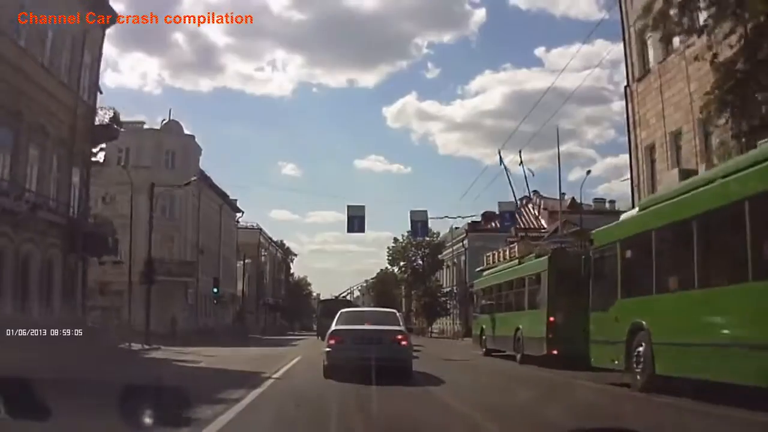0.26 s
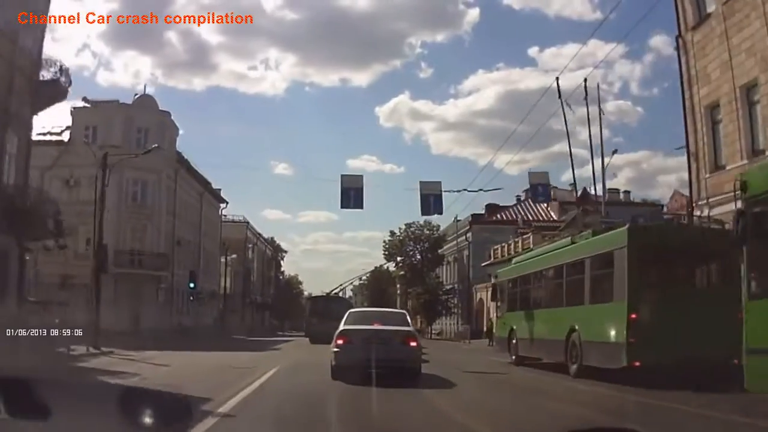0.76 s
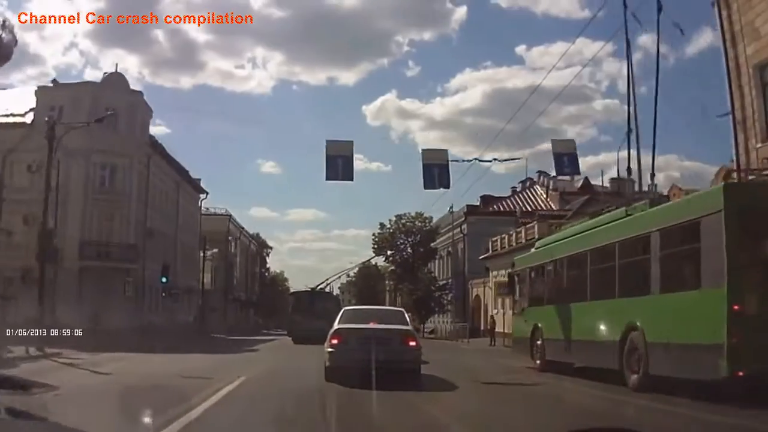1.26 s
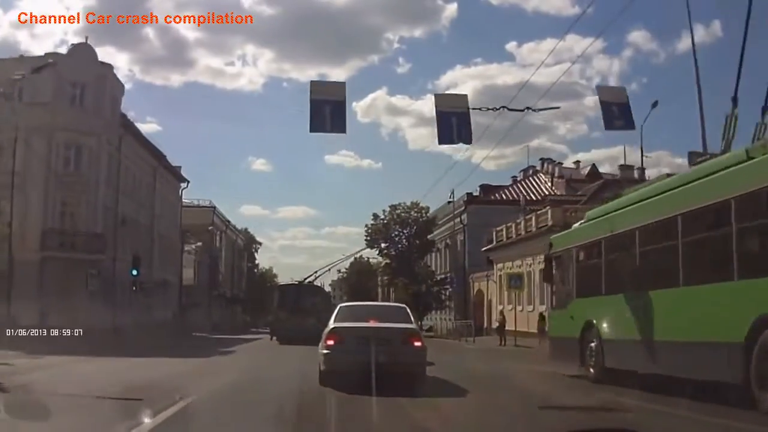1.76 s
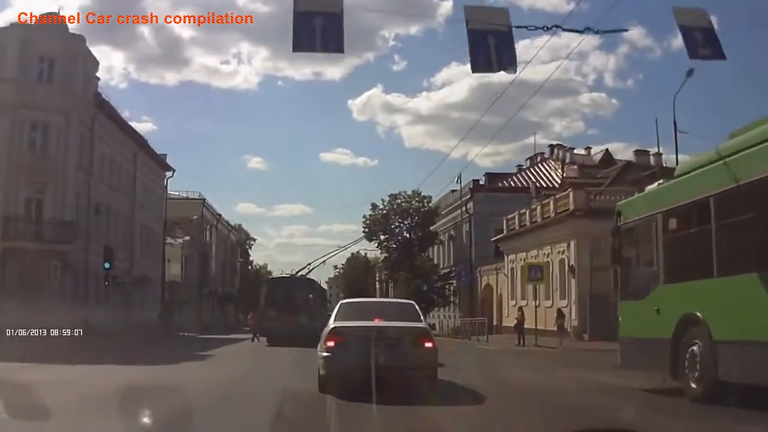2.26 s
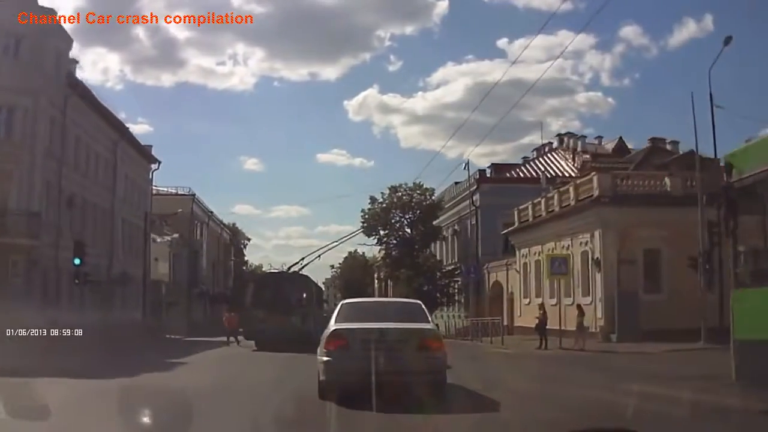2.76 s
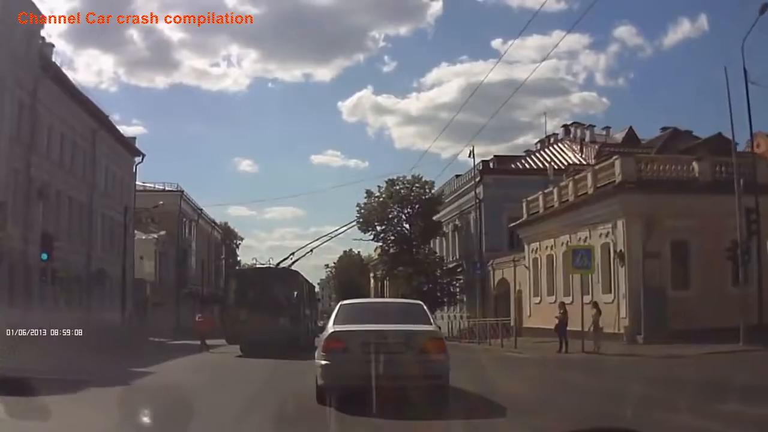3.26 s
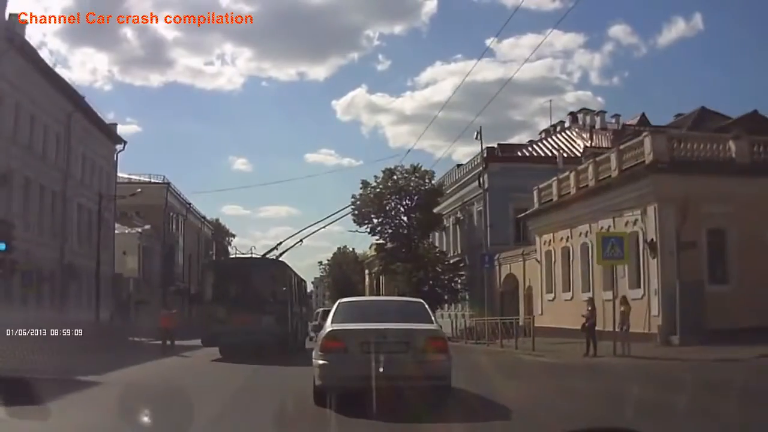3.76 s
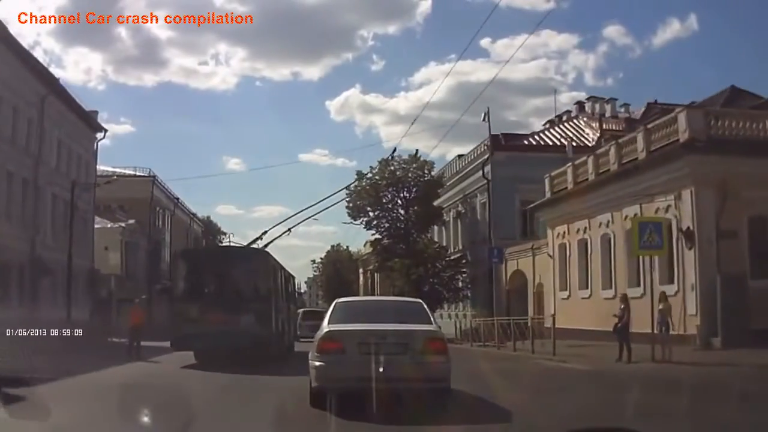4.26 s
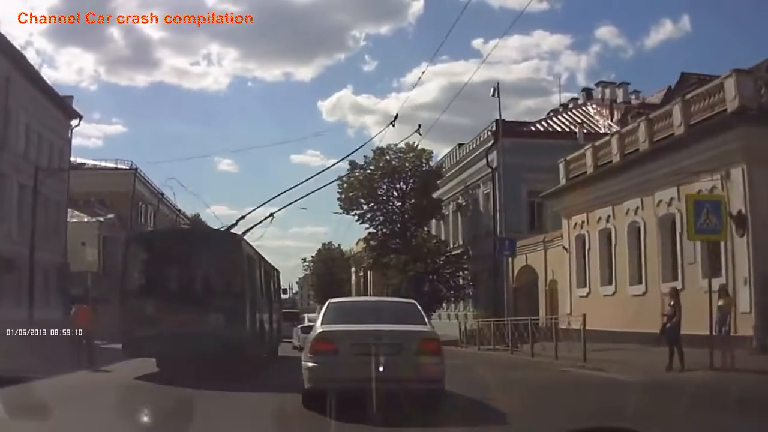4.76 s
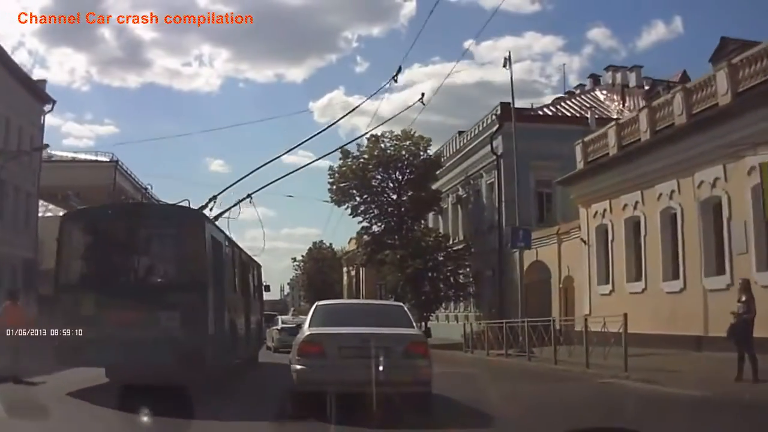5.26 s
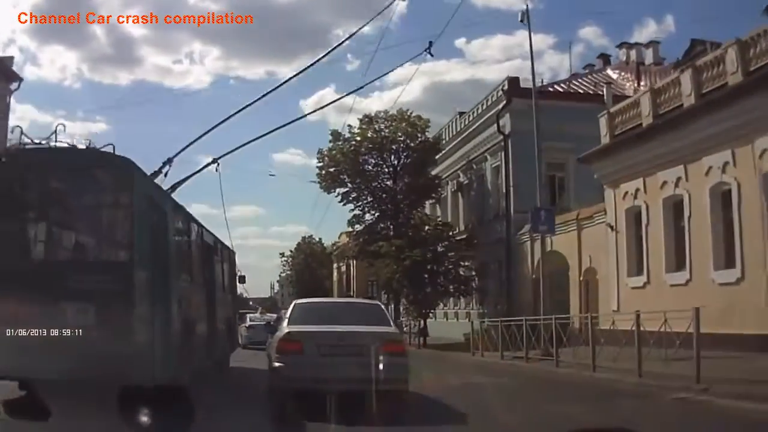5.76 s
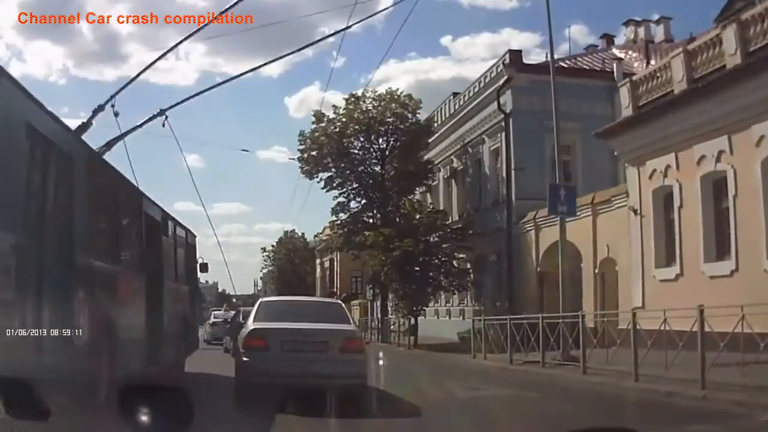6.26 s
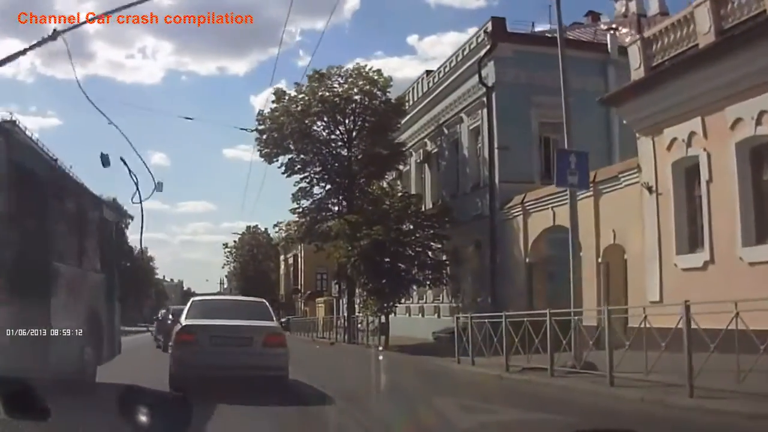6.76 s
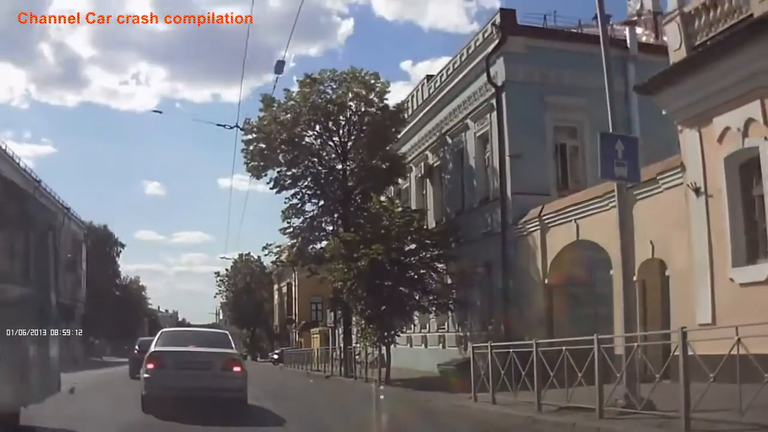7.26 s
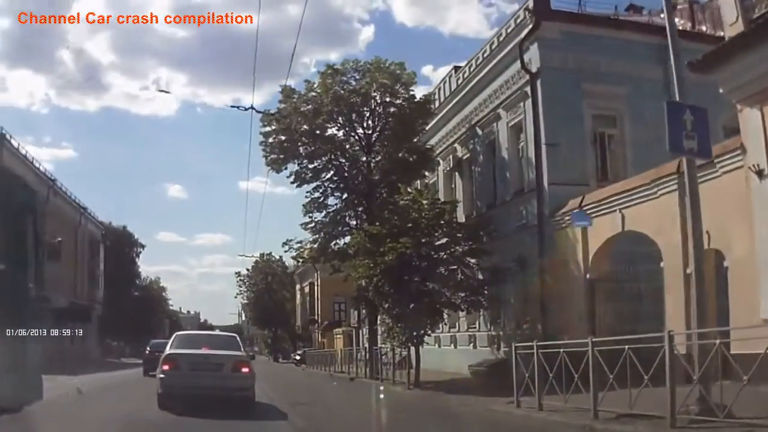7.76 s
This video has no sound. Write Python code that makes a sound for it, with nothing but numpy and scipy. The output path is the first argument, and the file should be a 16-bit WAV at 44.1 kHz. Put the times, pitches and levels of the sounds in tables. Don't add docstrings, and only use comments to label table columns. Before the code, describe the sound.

Crash debris cuts off at once, then a slow car's booming low cabin rumble, faint dash ticks, and dull bangs with rattling trim.

```python
import sys
import numpy as np
from scipy import signal
from scipy.fft import rfft, irfft, next_fast_len
from scipy.io import wavfile
from scipy.ndimage import uniform_filter1d, map_coordinates

SR = 44100
rng = np.random.default_rng(int(sys.argv[2]) if len(sys.argv) > 2 else 0)


def invert_db(x):
    u = np.asarray(x, float) / 20
    return 10 ** u


def to_wav(sig):
    pcm = np.clip(np.atleast_2d(sig), -1, 1) * 32767
    pcm = np.round(pcm).astype(np.int16)
    wavfile.write(sys.argv[1], SR, pcm.T)


N = 353241

# pitch_hz, level_db (per Hz)
HISS_COLOUR = [(1100, -28.5), (2000, 10.5), (3700, 4.5), (4700, 8), (5700, -16), (6900, 9.5), (7200, -14),
               (7400, -39), (8500, -26), (9600, -22), (10400, 5.5), (12200, -16.5), (12900, -31.5),
               (14400, -8.5)]
# pitch_hz, level_db (rms)
CIRCUIT_WHINE = [(7128, -80), (7183, -83), (10432, -83)]
# pitch_hz, threshold_db
TREBLE_THRESHOLD = [(3500, -14), (5700, -5), (7400, -2), (8500, -1), (9500, 3), (11500, 6), (12300, 6),
                    (13200, 2), (14500, 2)]
# start_s, peak_db
GAIN_EDGES = [(.2502, -39), (.4102, -32), (.5382, -40), (.6662, -33), (.6982, -40), (.7302, -37),
              (.7622, -36), (.7942, -35), (.8902, -35), (.9542, -36), (1.0182, -40), (1.1462, -36),
              (1.7862, -31), (2.2662, -36), (2.5862, -40), (2.7782, -34), (4.7302, -34), (4.7622, -37),
              (4.9542, -34), (4.9862, -36), (5.0502, -35), (5.4022, -39), (5.5622, -38), (5.6582, -37),
              (5.9782, -36), (6.1062, -34), (7.2902, -32), (7.3222, -37), (7.3862, -30), (7.4182, -41)]
# start_s, peak_db
OVERLOAD_CORNERS = [(.4268, -40), (.5044, -20), (.6776, -39), (.7517, -39), (.8075, -39), (.9627, -36),
                    (1.3817, -36), (1.4139, -38), (1.5911, -34), (1.6254, -38), (1.6361, -40),
                    (1.8231, -40), (1.8449, -38), (1.9924, -40), (2.065, -39), (2.0927, -39), (2.1127, -39),
                    (2.2806, -40), (2.565, -39), (4.7177, -40), (4.7852, -37), (4.9671, -40), (5.0602, -39),
                    (5.1828, -37), (5.4207, -39), (5.6915, -39), (5.7577, -39), (5.8327, -39),
                    (6.1154, -39), (7.4049, -37)]
# start_s, end_s, rate_per_s
CRACKLE_SPELLS = [(.12, 1.15, 8), (1.26, 1.5, 14), (1.55, 1.68, 30), (1.78, 2.2, 16), (2.26, 3.06, 26),
                  (4.68, 4.84, 20), (5.13, 5.48, 45), (5.5, 6.11, 16), (6.45, 6.53, 40), (7.27, 7.42, 20)]
# start_s, peak_db
LONE_STEPS = [(3.0532, -43), (3.5734, -43), (3.7702, -42), (7.1073, -42), (5.1782, -40), (2.0102, -41),
              (5.5302, -41)]
# start_s, suspension_load_db, quiet_sound_gain_db
DRIVE = [(0.1, -14.5, -37.5), (0.3, -14.5, -34.5), (0.91, -17.5, -40), (2.44, -15, -37), (2.56, -14.5, -38),
         (2.72, -15.5, -38.5), (3.01, -16, -36), (4.35, -17.5, -36), (5.23, -14.5, -40), (5.65, -17, -37.5),
         (6.8, -15, -35), (6.97, -15, -34.5), (7.17, -15.5, -36.5), (7.19, -17.5, -37), (7.68, -22, -36),
         (7.88, -23.5, -37.5), (7.92, -25, -35.5), (8.01, -25, -38.5)]
# pitch_hz, level_db (per Hz)
PAN_COLOUR = [(6, -21), (14, 2), (24, 2.5), (52, 9.5), (70, 7), (100, 10), (125, -12.5), (200, -77)]
# pitch_hz, level_db (per Hz)
DRUM_COLOUR = [(90, -15.5), (120, 0), (145, 3), (170, -3), (200, -11.5), (260, -78.5)]
# pitch_hz, level_db (per Hz)
BLOCK_COLOUR = [(150, -32), (200, -0.5), (243, 4.5), (275, -3), (320, 1), (380, -9), (480, -45.5)]
# pitch_hz, level_db (per Hz)
ROAR_COLOUR = [(260, 4.5), (400, 3), (480, 1), (650, -0.5), (1000, -2.5), (1350, -5.5), (1550, -16),
               (1800, -26), (2300, -54)]
# start_s, swell_db
POTHOLES = [
    (.51, 1.5),
    (2.47, 5),
    (3.21, 3),
    (5.17, 3),
    (6.38, 1),
    (6.78, 2),
    (7.12, 0),
]
# start_s, swell_db
ENGINE_SURGES = [
    (1.62, 3),
    (2.2, 2.5),
    (2.55, 1.5),
    (5.6, 2),
    (6.2, 3),
    (7.9, -2),
]
# start_s, pitch_hz, level_db
CABIN_BOOM = [(0.0, 48.3, -18), (0.62, 42.44, -13), (1.25, 42.43, -5.5), (1.54, 50.1, -18.5),
              (1.65, 42.5, -11), (2.68, 42.55, -15), (3.01, 52.72, -15.5), (3.23, 37.0, -16),
              (3.7, 37.32, -23), (3.81, 44.07, -19.5), (4.13, 45.4, -22), (4.37, 37.0, -17.5),
              (5.24, 39.57, -16), (5.4, 37.0, -11.5), (6.31, 48.5, -18), (6.8, 42.2, -16.5),
              (7.97, 42.5, -14.5), (8.01, 42.1, -33.5)]
# start_s, pitch_hz, level_db
BODY_SHAKE = [(0.0, 31.17, -25), (0.89, 32.91, -13.5), (1.31, 30.3, -17.5), (1.83, 33.03, -15),
              (2.16, 28.5, -22.5), (2.63, 33.04, -17), (2.77, 29.3, -20.5), (3.55, 30.98, -20),
              (3.86, 23.47, -27), (4.06, 31.2, -20.5), (4.91, 32.93, -13.5), (6.22, 32.9, -17),
              (6.42, 27.63, -11.5), (7.03, 27.5, -22.5), (7.45, 23.57, -18), (7.76, 23.73, -16.5),
              (7.92, 32.1, -17.5), (8.01, 32.66, -33.5)]
# start_s, level_db
DEBRIS_FADE = [(0, -18), (.02, -18), (.035, -22), (.055, -24.5), (.062, -35), (.075, -45.5), (.09, -59.5),
               (.11, -110)]
# pitch_hz, level_db (per Hz)
SHARD_COLOUR = [(150, -33), (250, -9.5), (484, -6.5), (555, -4), (614, -15.5), (668, -6), (1110, -14.5),
                (1210, -16.5), (3400, -19), (5380, -20.5), (6160, -19), (14400, -29)]
# pitch_hz, level_db, t60_s
SHEET_METAL = [(390, -23.5, .15), (562, -24, .15), (740, -27, .12), (6430, -30, .05)]
# pitch_hz, width_hz, level_db
TRIM_MODES = [(2300, 900, -5), (3250, 450, -4), (4750, 700, -5), (6050, 500, -9), (7100, 500, -10),
              (8600, 600, -12), (10500, 500, -16)]
# pitch_hz, width_hz, level_db
PANEL_MODES = [(330, 220, 0.5), (800, 360, 2), (1270, 370, 2.5)]
# start_s, peak_db
DASH_TICKS = [
    (2.852, -43),
    (3.228, -38),
    (3.569, -34.5),
    (3.964, -37.5),
]
# pitch_hz, width_hz, level_db, thud_db, t60_s
TICK_PARTS = [(2726, 420, -0.5, -7, 0.053), (5500, 900, -4, -9, .045)]
# start_s, rattle_peak_db, part_pitch_hz, part_width_hz, thud_over_rattle_db
BODY_BLOWS = [(4.267, -31.5, 4820, 3500, -6), (4.274, -31, 4570, 2400, 7.5), (4.311, -36.5, 4750, 5000, 6),
              (4.34, -48, 4198, 4000, 1), (6.59, -39, 3299, 7000, 13), (6.627, -35, 3606, 7000, 8),
              (6.649, -38.5, 2600, 4000, -2), (6.712, -41.5, 3290, 5000, 2), (6.772, -25.5, 3080, 1200, -1),
              (6.774, -33, 3600, 7000, 9.5), (6.799, -34, 4300, 3200, 12), (6.822, -35, 4230, 3000, -6),
              (7.363, -39, 4044, 4500, -9), (7.452, -47, 3600, 5000, 19), (7.634, -42, 4070, 5000, 12),
              (7.794, -44.5, 7000, 3500, -12), (7.871, -41, 4570, 5000, -1), (7.93, -47.5, 4470, 4000, -4)]
# start_s, peak_db, pitch_hz, thud_db
TRIM_SNAPS = [
    (4.281, -35, 2992, 4),
    (6.604, -35, 4000, 10),
    (6.63, -37, 5500, 1),
    (6.777, -29, 5500, 4),
    (7.445, -34.5, 3600, 19),
    (7.812, -31, 5500, -8),
]
# start_s, peak_db, pitch_hz, thud_db
TRIM_KNOCKS = [
    (6.864, -40, 3170, 5),
    (7.021, -50, 4670, 3),
    (7.056, -41.5, 3120, 10),
    (7.14, -47.5, 4700, 3),
    (7.744, -46, 4300, 3),
]
# start_s, peak_db, pitch_hz, width_hz
TRIM_SHIVER = [
    (6.9, -57, 4780, 450),
    (6.86, -50.5, 3400, 4600),
    (7.3, -55, 5000, 6000),
    (7.45, -56.5, 4300, 6000),
]

LOUDEST_SWING_DB = -7


def unit(x):
    return x / np.sqrt(np.mean(x ** 2) + 1e-20)


def curves(rows):
    s, *columns = np.transpose(rows)
    return [np.interp(np.arange(N) / SR, s, column) for column in columns]


def wobble(rate):
    knots = rng.standard_normal(int(N * rate / SR) + 4)
    return map_coordinates(knots, [np.arange(N) * rate / SR])


def swells(rows, width_s):
    t = np.arange(N) / SR
    return sum(db * np.exp(-((t - s) / width_s) ** 2) for s, db in rows)


def filtered(x, response):
    n = x.shape[-1]
    padded = next_fast_len(n + 8192)
    return irfft(rfft(x, padded) * response(np.fft.rfftfreq(padded, 1 / SR)), padded)[..., :n]


def noise(spectrum, shape=N):
    f, db = np.transpose(spectrum)
    white = rng.standard_normal(shape)
    return unit(filtered(white, lambda hz: invert_db(np.interp(np.log(hz + 1), np.log(f + 1), db))))


def resonances(modes):
    def response(f):
        return sum((-1) ** k * invert_db(db) * 1j * f * width / (hz * hz - f * f + 1j * f * width)
                   for k, (hz, width, db) in enumerate(modes))
    return response


def electronics():
    t = np.arange(N) / SR
    whine = sum(np.sqrt(2) * invert_db(db) * np.sin(2 * np.pi * hz * t) for hz, db in CIRCUIT_WHINE)
    slow_gain_db = uniform_filter1d(curves(DRIVE)[1], size=SR // 2)
    hiss_db = -61.5 + 0.83 * (slow_gain_db + 37) + 0.46 * wobble(36)
    return invert_db(hiss_db) * noise(HISS_COLOUR) + whine


def clicks():
    strong = GAIN_EDGES + OVERLOAD_CORNERS
    edges = np.arange(.0262, N / SR, .032)
    edges = edges[rng.random(len(edges)) < .4]
    faint = []
    for start, end, rate in CRACKLE_SPELLS:
        faint.append(rng.uniform(start, end, round(rate * (end - start))))
        faint.append(edges[(edges > start) & (edges < end)])
    neighbours = np.transpose(strong)[0] + .022 * rng.standard_normal(len(strong))
    faint = np.concatenate(faint + [neighbours])
    faint_db = -42 + rng.standard_normal(len(faint))
    return list(zip(faint, faint_db)) + strong + LONE_STEPS


def gain_steps(cabin):
    jumps = np.zeros(N)
    for s, db in clicks():
        i = round(s * SR)
        jumps[i] = -np.sign(cabin[i]) * invert_db(db + 12)
    leak = np.exp(-np.arange(SR // 20) / SR / 0.0016)
    edge = signal.fftconvolve(jumps, leak)[:N]
    smear = signal.fftconvolve(jumps ** 2, np.hanning(SR // 120), "same")
    grit_colour = [(1200, 1.5), (2000, -1.5), (7000, -12.0), (14500, -13.5)]
    grit = invert_db(-23.5) * np.sqrt(np.abs(smear)) * noise(grit_colour)
    return filtered(edge, lambda hz: 1 / (1 + 1j * hz / 11000) ** 2) + grit


def thinned(x, whim_db):
    hz, _, z = signal.stft(x, SR, nperseg=2048)
    whim = rng.standard_normal((len(hz) // 20 + 1, z.shape[-1]))
    whim = np.repeat(whim, 20, axis=0)[:len(hz)]
    usual = uniform_filter1d(np.median(np.abs(z), axis=-1, keepdims=True), 70, axis=-2)
    threshold_db = np.interp(hz, *np.transpose(TREBLE_THRESHOLD))[:, None] + whim_db * whim
    bar = usual * invert_db(threshold_db) * (hz[:, None] > TREBLE_THRESHOLD[0][0])
    return signal.istft(z * (np.abs(z) >= bar), SR, nperseg=2048)[1][..., :N]


def road():
    load_db, gain_db = curves(DRIVE)
    bumps = wobble(16)
    pan_db = -16.5 + 0.87 * (load_db + 16.5)
    drum_db = -21 + (load_db + 16) + swells(POTHOLES, 0.094) + 1.5 * bumps
    block_db = -32 + 0.34 * (load_db + 15.5) + 0.067 * (gain_db + 36.5)
    block_db = block_db + swells(ENGINE_SURGES, 0.13) + 2.18 * bumps + 1.17 * wobble(45)
    roar_db = gain_db + 5.0 + 0.62 * bumps + 1.27 * wobble(40)
    pan = invert_db(pan_db) * noise(PAN_COLOUR)
    drum = invert_db(drum_db) * noise(DRUM_COLOUR)
    block = invert_db(block_db) * noise(BLOCK_COLOUR)
    roar = invert_db(roar_db) * noise(ROAR_COLOUR)
    return pan + drum + block + roar


def drone(rows, rate, rough):
    hz, db = curves(rows)
    db = np.minimum(db, LOUDEST_SWING_DB)
    share = rough + 0.047 * (LOUDEST_SWING_DB - db)
    drive = (1 + share * (wobble(rate) + 1j * wobble(rate))) / np.sqrt(1 + 2 * share ** 2)
    return invert_db(db) * unit(np.real(drive * np.exp(2j * np.pi * np.cumsum(hz) / SR)))


def debris():
    t = np.arange(N) / SR
    spray = invert_db(curves(DEBRIS_FADE)[0] + 1.2 * wobble(250))
    mid, side = spray * noise(SHARD_COLOUR, (2, N)) * invert_db([[1.2], [-4.5]])
    ring = sum(invert_db(db - 60 * t / t60) * np.sin(2 * np.pi * hz * t) for hz, db, t60 in SHEET_METAL)
    mid = mid + ring * invert_db(2.5 * wobble(120))
    stereo = np.array([mid + side, mid - side]) * invert_db([[.7], [-.7]])
    return filtered(stereo, lambda hz: 1 / (1 + (hz / [[13500], [12300]]) ** 12))


def strikes():
    ticks = [(s, db + part_db, hz, width, thud_db, t60)
             for s, db in DASH_TICKS for hz, width, part_db, thud_db, t60 in TICK_PARTS]
    blows = [(*blow, .11) for blow in BODY_BLOWS]
    snaps = [(s, db, hz, 6500, thud_db, 0.072) for s, db, hz, thud_db in TRIM_SNAPS]
    knocks = [(s, db, hz, 900, thud_db, .1) for s, db, hz, thud_db in TRIM_KNOCKS]
    shiver = [(s, db, hz, width, 4.5, 1) for s, db, hz, width in TRIM_SHIVER]
    return ticks + blows + snaps + knocks + shiver


def bangs():
    out, t = np.zeros(N + SR), np.arange(SR // 2) / SR
    clump_t = t[::round(.003 * SR)]
    trim, panel = resonances(TRIM_MODES), resonances(PANEL_MODES)
    for s, db, part_hz, width_hz, thud_db, t60 in strikes():
        swell = (1 - np.exp(-t / 0.0088)) ** 2 * invert_db(-60 * t / t60)
        chatter = rng.standard_normal((2, len(t))) * invert_db(5.5 * rng.standard_normal((2, len(t))))
        chatter = chatter * invert_db(3 * np.interp(t, clump_t, rng.standard_normal(len(clump_t))))
        part = resonances([(part_hz, width_hz, 0)])
        rattle = filtered(chatter[0], lambda f: (.5 + np.abs(trim(f))) * part(f) ** 2 / (1 + (f / 9200) ** 6))
        thud = filtered(chatter[1], lambda f: panel(f) / (1 + 1j * f / 2000) ** 4)
        rattle = invert_db(db + 1.5) * unit(rattle)
        thud = invert_db(db + thud_db + 7.5) * unit(thud) * invert_db(-60 * t / 0.38)
        out[round((s - .004) * SR):][:len(t)] += swell * (rattle + thud)
    return out[:N]


def scene():
    swing = drone(CABIN_BOOM, 14, rough=.12) + drone(BODY_SHAKE, 16, rough=.2)
    cabin = swing + road() + bangs()
    ceiling = np.where(cabin > 0, .67, .65)
    squashed = cabin / (1 + np.abs(cabin / ceiling) ** 14) ** (1 / 14)
    camera = squashed + gain_steps(squashed) + electronics()
    return thinned(camera, whim_db=3) + debris()


def band_limit(x):
    return signal.sosfilt(signal.butter(12, 14540, fs=SR, output="sos"), x)


def record(dry):
    mix = filtered(dry, lambda hz: hz < 14490)
    return band_limit(mix)


dry = scene()
out = record(dry)
to_wav(out)
```